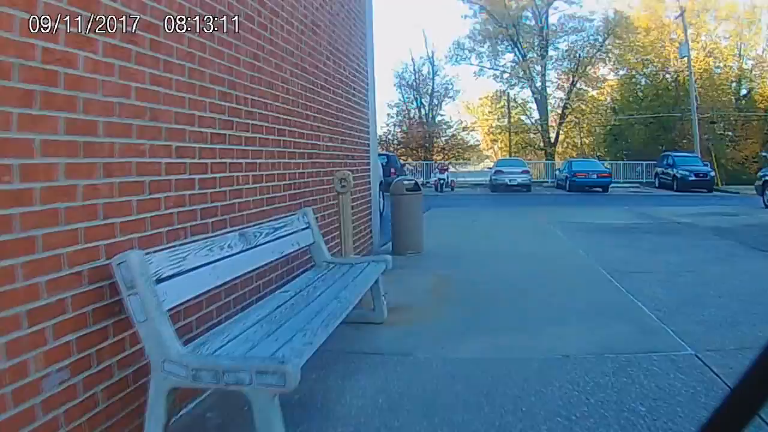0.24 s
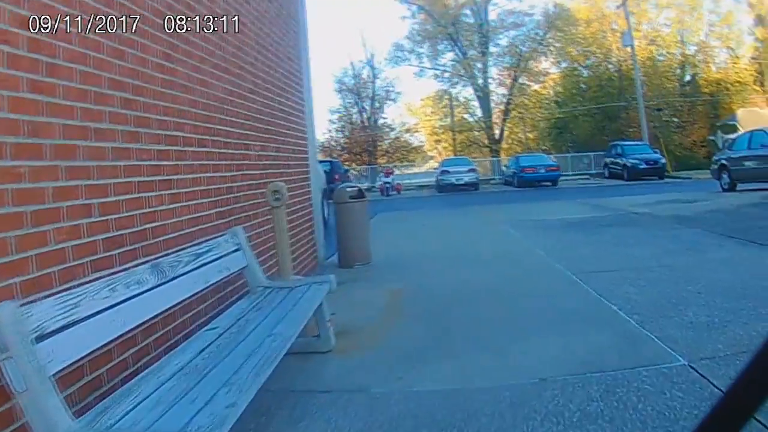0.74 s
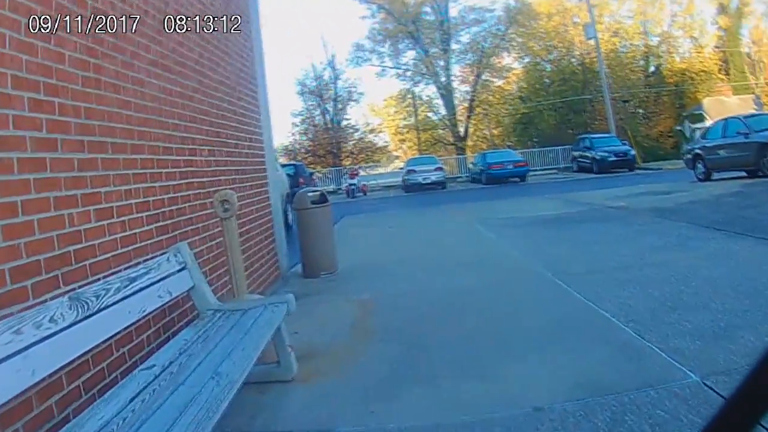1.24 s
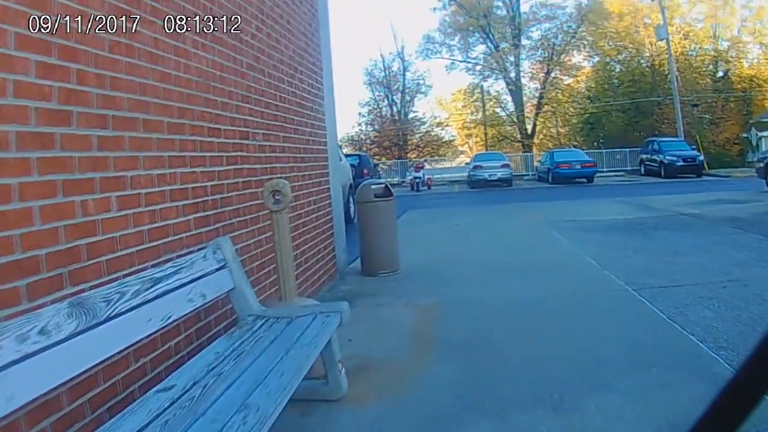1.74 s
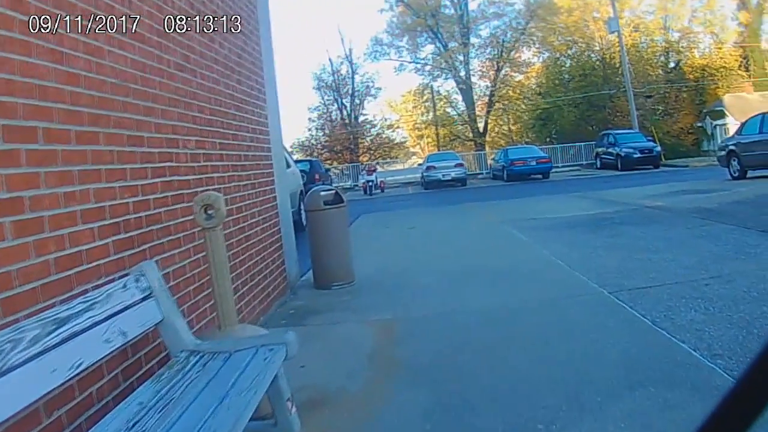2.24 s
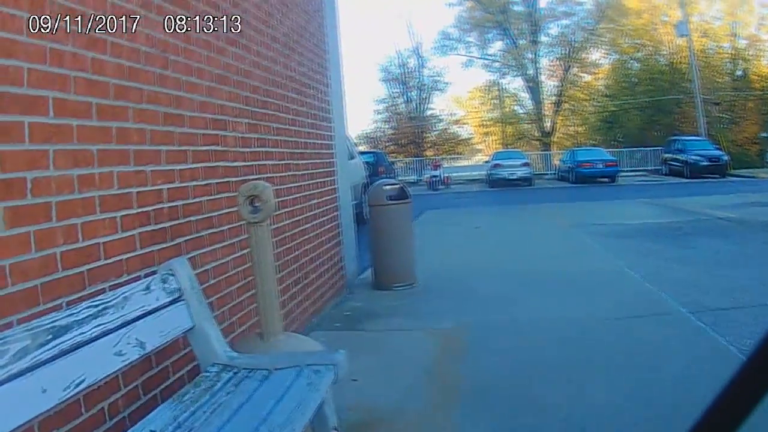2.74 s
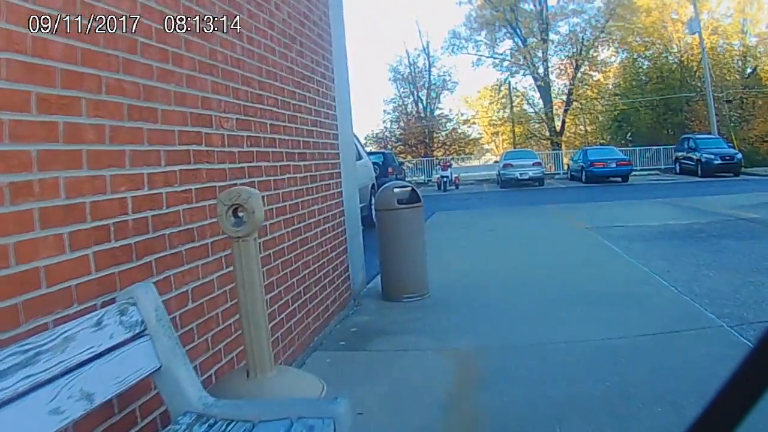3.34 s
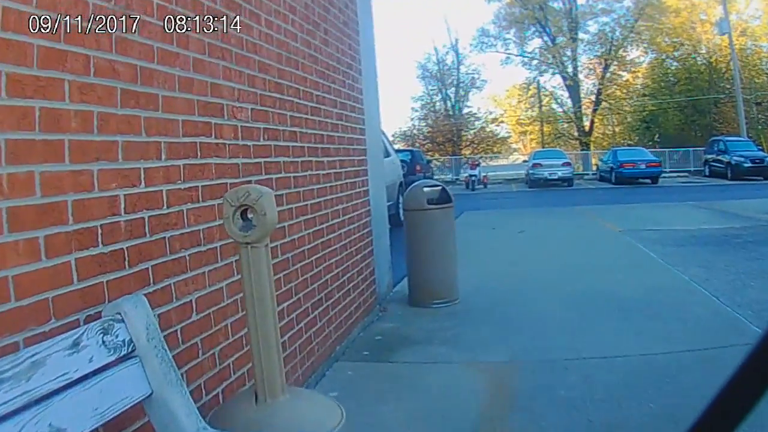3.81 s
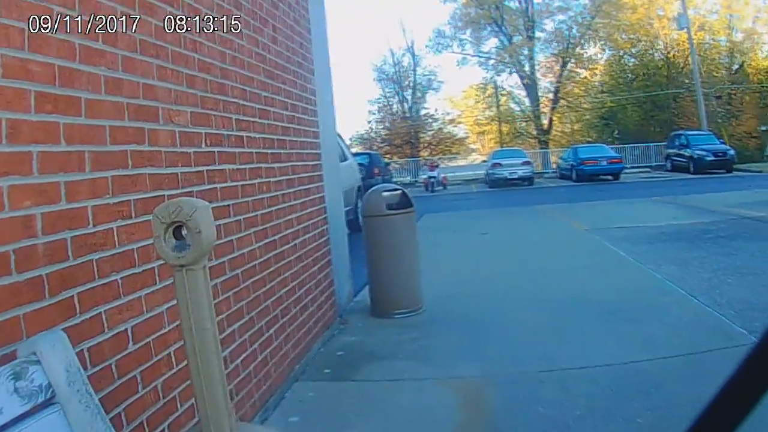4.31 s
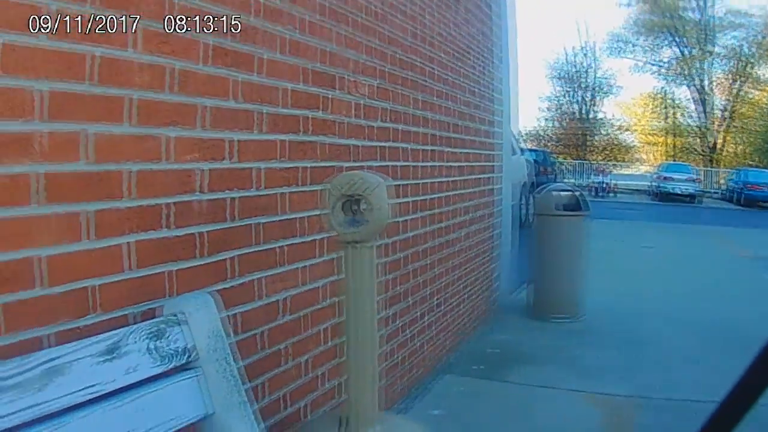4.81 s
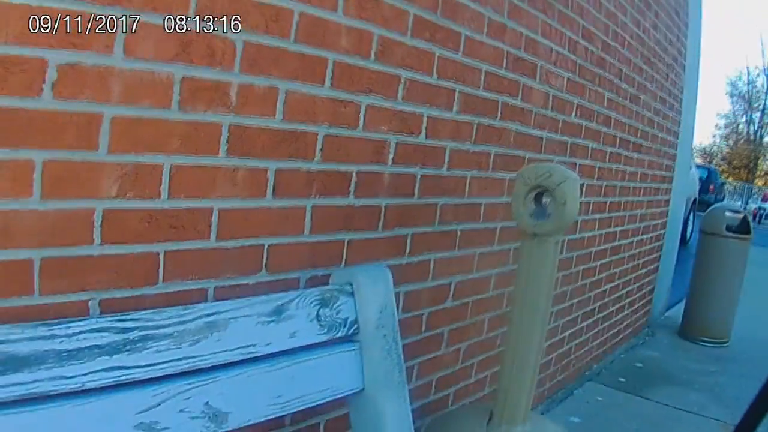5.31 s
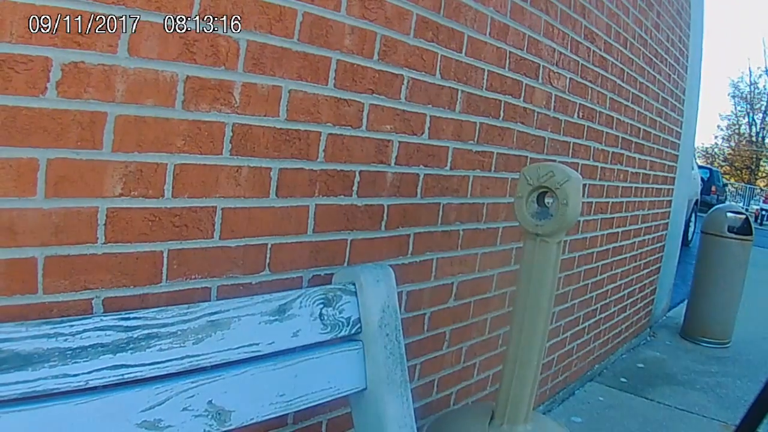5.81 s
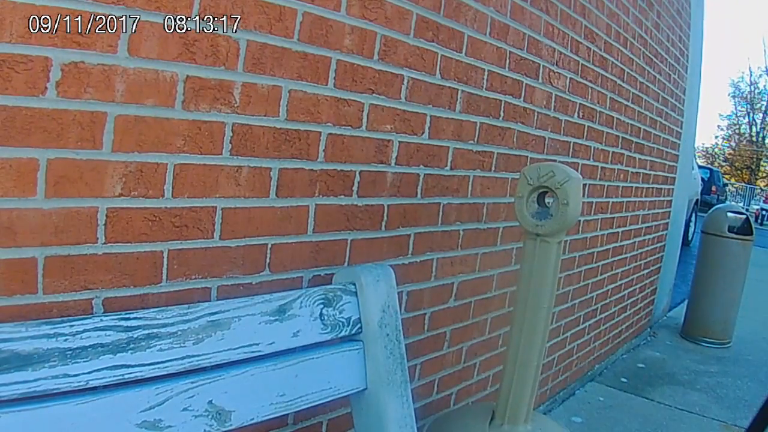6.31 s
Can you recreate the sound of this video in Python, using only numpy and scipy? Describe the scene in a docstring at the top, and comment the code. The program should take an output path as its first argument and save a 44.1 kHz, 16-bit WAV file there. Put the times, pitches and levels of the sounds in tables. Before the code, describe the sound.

A bicycle rolls slowly outdoors and is leant at a brick wall: low shuddering rumble, plastic ticks, hollow frame knocks, harsh clipped buffeting near the end.

```python
"""Camera clamped to a bicycle

The bicycle is wheeled slowly over paving and leant against a wall, heard from the camera's microphone.
The mount is noise resonating near 30 Hz; its slips are shaped pressure steps that overdrive the input.
Knocks, thuds and clacks are short shaken ticks ringing the frame, the saddle and tyres, and the case.
Rolling and rubbing are gritty noise through the same modes, with filtered noise for squeaks and crackle.
The camera adds a steady shaped hiss, a swelling fizz and a whine of close sine tones."""
import sys
import numpy as np
from scipy import signal
from scipy.fft import rfft, irfft
from scipy.io import wavfile
from scipy.ndimage import uniform_filter1d

SR = 44100
rng = np.random.default_rng(int(sys.argv[2]) if len(sys.argv) > 2 else 0)


def digitize_waveform(pressure):
    """Quantize a signal to 16-bit integers and store it at the path in sys.argv[1].

    Rows of a 2-D input are taken as channels; values are limited to [-1, 1].
    """
    field = np.atleast_2d(pressure).T
    bounded = np.clip(field, -1, 1)
    quanta = np.round(bounded * 32767).astype(np.int16)
    wavfile.write(sys.argv[1], SR, quanta)


def volts(x):
    """Linear amplitude factor 10**(x/20) for a level x in dB, scalar or array-like."""
    e = np.asarray(x, float) / 20
    return 10 ** e


N = 288839  # length [samples]
RAIL = .255  # pressure at which the microphone input clips [full scale]


def evened(x):
    """Scales to rms 1."""
    return x / np.sqrt(np.mean(x ** 2) + 1e-20)


def curve(rows, order):
    """Draws one column of a table as a line through time, sample by sample."""
    rows = np.array(rows)
    return np.interp(np.arange(N) / SR, rows[:, 0], rows[:, order])


def add(mix, s, sound):
    """Mixes a sound in at s seconds."""
    part = mix[max(round(s * SR), 0):][:len(sound)]
    part += sound[:len(part)]


def ease(u):
    """Soft step from 0 to 1."""
    return .5 - .5 * np.cos(np.pi * np.clip(u, 0, 1))


def swells(rows, rise, fall):
    """Sums soft-edged envelopes, one per (start, length, level) row; rise and fall give each ramp."""
    t = np.arange(N) / SR
    (rise_s, rise_lead), (fall_s, fall_lead) = rise, fall  # (ramp [s], lead [share of the ramp])
    total = np.zeros(N)
    for s, length, db in rows:
        fade_in = ease((t - s) / rise_s + rise_lead)
        fade_out = ease((s + length - t) / fall_s + fall_lead)
        total += volts(db) * fade_in * fade_out
    return total


def ring(x, modes, detune=0, bright_db=0, flip=-1):
    """Rings a bank of resonances; bright_db lifts the upper half, flip scales each mode from the last."""
    out = np.zeros(len(x))
    for k, (hz, width, db) in enumerate(modes):
        hz = hz * (1 + detune * np.sin(k * k + detune * 1000))
        lift_db = bright_db * (k > len(modes) / 2)
        out += flip ** k * volts(db + lift_db) * signal.lfilter(*signal.iirpeak(hz, hz / width, SR), x)
    return out


def grit(per_s, spread_db, smooth, grain_ms):
    """Sparse short scuffs of uneven size, over a share of smooth noise."""
    size = volts(spread_db * np.minimum(rng.exponential(1, N), 4))
    size = size * (rng.random(N) < per_s / SR)
    scuffs = signal.oaconvolve(size, np.exp(-np.arange(2000) / SR * 1000 / grain_ms))[:N]
    return (evened(scuffs) + smooth) * rng.standard_normal(N)


def coarse_grit():
    """Uneven coarse scuffing, for the rolling and the rasp of the rubs."""
    return grit(per_s=120, spread_db=2, smooth=2, grain_ms=5)


def after(hits, decay_ms):
    """An envelope that jumps by the size of each hit (time, size) and dies away."""
    spikes = np.zeros(N)
    for s, size in hits:
        spikes[round(s * SR)] += size
    dying = signal.lfilter([1], [1, -np.exp(-1000 / decay_ms / SR)], spikes)
    return uniform_filter1d(dying, 400)  # rounds the onsets


def blows(rows, modes, shake_ms, tick, detune, contact_ms, flip):
    """Each blow is a tick and a short random shake, softened by the contact time, ringing the modes."""
    out, t = np.zeros(N), np.arange(9000) / SR
    pad = signal.windows.hann(round(contact_ms * SR / 1000) + 3)
    for s, peak_db, bright_db in rows:
        decays = t * 1000 / shake_ms
        drive = rng.standard_normal(len(t)) * np.exp(-decays) * ease(decays / 0.31)
        drive[0] += tick * np.sqrt(shake_ms)
        drive = np.convolve(drive, pad)[:len(t)]
        sound = ring(drive, modes, detune * rng.uniform(-1.058, 1), bright_db, flip)
        add(out, s, volts(peak_db) * sound / abs(sound).max())
    return out


# How hard things move: (time [s], sway of the mount [dB], rolling felt in the frame [dB])
MOTION = [(0.0, -47, -40.5), (0.25, -41.5, -47.5), (0.56, -37.5, -52.5), (0.78, -35.5, -52),
          (0.89, -40.5, -52), (1.35, -44, -52), (1.5, -38.5, -49), (1.7, -37.5, -58), (2.21, -42.5, -52),
          (2.46, -39, -38), (2.63, -41.5, -51), (2.94, -40.5, -54.5), (3.56, -42, -61), (3.9, -43, -56.5),
          (4.36, -50, -66), (4.82, -57, -44), (5.2, -52, -52.5), (5.4, -45, -36), (5.53, -38, -50.5),
          (5.8, -36.5, -61), (6.02, -42, -84), (6.24, -46.5, -57), (6.4, -52, -53.5), (6.55, -46, -62)]
# Resonances of the mount: (frequency [Hz], width [Hz], level [dB])
MOUNT_MODES = [(30.8, 10.5, 2), (49.7, 22, -4.5), (103.3, 58, -21.5)]


def sway():
    """Low shaking of the mount on its springy clamp, rocked harder by knocks and the smaller slips."""
    rock_db, rock_ms = -14, 24.8  # level under the blow, decay
    shake = ring(ring(rng.standard_normal(N), MOUNT_MODES), [(38.5, 162, 0)])
    envelope = uniform_filter1d(abs(signal.hilbert(shake)), 2500)
    steadied = evened(shake / envelope ** 0.68)  # partly levels the random swelling
    hits = [(s, volts(db)) for s, db, _ in KNOCKS]
    hits += [(s, abs(end - start) / 2) for s, start, end, _ in JOLTS if abs(end) < .2]
    return (volts(curve(MOTION, order=1)) + volts(rock_db) * after(hits, rock_ms)) * steadied


# Resonances of the bicycle frame: (frequency [Hz], width [Hz], level [dB])
FRAME_MODES = [(108.5, 23.4, -4.5), (191, 12, -21.5), (253, 7.2, 0), (299.8, 13.1, 5.5), (316, 33, -5),
               (363.6, 15.4, -2.5), (438, 12.4, -6), (478, 39, -5), (526, 3.3, -15), (602, 2.6, -15.5),
               (728, 23, -20), (904, 95, -23), (964, 13.5, -18), (1190, 67, -23)]


def rolling():
    """Coarse grit of the rolling tyres hums in the frame, and each knock leaves the frame humming."""
    judder_db, judder_ms = -17.5, 45  # level under the knock, decay
    dulled = signal.sosfilt(signal.butter(2, 1500, fs=SR, output="sos"), coarse_grit())
    frame = evened(ring(dulled, FRAME_MODES))
    judder = after([(s, volts(db)) for s, db, _ in KNOCKS], judder_ms)
    return (volts(curve(MOTION, order=2)) + volts(judder_db) * judder) * frame


# Resonances of the plastic case: (frequency [Hz], width [Hz], level [dB])
CASE_MODES = [(734, 80, -6.5), (1088, 50, -4), (1301, 67, -1), (1406, 16, -0.5), (1498, 66, 0.5),
              (1812, 80, 0.5), (1905, 118, -3.5), (2100, 249, -8), (2240, 43, -11), (2553, 37, -18),
              (3030, 70, -22), (3266, 40, -17), (3455, 160, -20.5), (4400, 200, -29), (5080, 70, -22.5),
              (5840, 67, -36), (5870, 110, -31.5), (7900, 200, -45)]
# Rubs on the case: (start [s], length [s], level [dB])
RUBS = [(0, .2, -56), (0.46, 0.11, -66), (0.61, 0.22, -65), (0.94, 0.22, -71), (1.375, .16, -77),
        (1.848, 0.24, -66.5), (2.241, 0.39, -59), (2.773, .13, -65), (3.06, 0.18, -74), (3.246, 0.17, -63),
        (3.511, 0.35, -64.5), (3.98, .17, -66), (4.301, 0.28, -70.5), (4.578, 0.26, -69), (4.79, 0.25, -61),
        (5.046, 0.14, -72.5), (5.185, 0.097, -58), (5.325, 0.25, -59), (5.655, 0.023, -67),
        (5.838, 0.016, -64), (6.239, 0.026, -53.5), (6.323, 0.22, -63)]


def rubbing():
    """Hands and cables rub the case: fine scuffs ring the plastic, with a brighter rasp of the frame."""
    rest_db = -86.5  # level always present under the rubs
    rub = grit(per_s=220, spread_db=2.8, smooth=1.5, grain_ms=3)
    case = evened(ring(rub, CASE_MODES, bright_db=3.0))
    backwards = coarse_grit()[::-1]  # scuffs swell instead of dying
    rasp = evened(ring(backwards, FRAME_MODES, bright_db=9))
    press = swells(RUBS, rise=(0.023, .5), fall=(0.12, .5))
    return (press + volts(rest_db)) * case + press * volts(-0.5) * rasp


# Colour of the camera's hiss: (frequency [Hz], relative level [dB])
HISS_COLOUR = [(59, -40), (100, -28.5), (197, -17), (295, -16.5), (406, -6.5), (492, -10.5), (818, -31),
               (1800, -25.5), (2420, -31.5), (7140, -37.5), (12900, -39.5), (14100, -33), (16000, -40)]


def hiss():
    """Steady electronic noise shaped along a spectrum, with its part above 2500 Hz setting the level."""
    level_db = -76
    hz = np.fft.rfftfreq(N, 1 / SR)
    f, db = np.transpose(HISS_COLOUR)
    shape = volts(np.interp(np.log(hz + 1), np.log(f), db))
    shaped = irfft(rfft(rng.standard_normal(N)) * shape, N)
    return volts(level_db) * shaped / np.sqrt(np.mean(shape ** 2 * (hz > 2500)))


# Starts of the short swells of fizz: time [s]
FIZZ_TIMES = [.459, .832, .874, 1.234, 1.714, 2.211, 2.612, 3.04, 3.459, 3.959, 4.376, 4.744, 5.207, 5.656,
              6.108, 6.155]
# Bands of the fizz: (frequency [Hz], width [Hz], level [dB])
FIZZ_BANDS = [(11150, 590, 2), (15400, 2300, -15)]


def fizz():
    """Bright band-filtered electronic noise that swells now and then over a faint bed."""
    rest_db, swell_db, swell_ms = -82, -77.5, 42
    gate = volts(rest_db) * np.ones(N)
    for s in FIZZ_TIMES:
        add(gate, s, volts(swell_db) * signal.windows.tukey(round(swell_ms * SR / 1000), .3))
    banded = ring(rng.standard_normal(N), FIZZ_BANDS)
    return gate * evened(ring(banded, [(13000, 18000, 0)]))


# Tones of the whine: (frequency [Hz], rms level [dB])
WHINE_TONES = [(13695, -96), (13749, -86), (13803, -93), (13857, -97)]


def whine():
    """Close sine tones that beat into a thin pulsing whine."""
    t = np.arange(N) / SR
    return sum(np.sqrt(2) * volts(db) * np.cos(2 * np.pi * hz * t) for hz, db in WHINE_TONES)


# Clacks of the case: (time [s], peak level [dB], brightness [dB])
CLACKS = [(.0544, -42, -3), (.17, -63, 6), (.4494, -52, 4), (.4844, -57, 7), (1.2164, -51, 0),
          (1.3886, -52, 9.5), (1.487, -41.5, -9), (1.5827, -50.5, 2), (1.6127, -53.5, 10),
          (1.7148, -48.5, -3), (2.2398, -41.5, -7), (2.281, -42, -8), (2.3226, -43.5, -7),
          (2.363, -40.5, -11), (2.418, -40, -1), (2.682, -50.5, 8), (2.7826, -35.5, -2.5),
          (2.815, -46.5, -8), (3.0692, -56, 8), (3.124, -50.5, -6), (3.3129, -45, 3), (3.6048, -36.5, -6),
          (3.6968, -47.5, 6), (3.7839, -50, 0), (3.8333, -39.5, -6), (3.979, -48.5, -2), (4.009, -43, 6),
          (4.073, -49, 5), (4.3276, -49, 0), (4.4776, -45, 0), (4.577, -37.5, -13), (4.623, -42, -14),
          (4.738, -47, -4), (4.799, -40.5, 2), (4.847, -45, -12), (4.8623, -39, -5), (4.8747, -32, -8),
          (4.8893, -29.5, -5.5), (4.9045, -42, 0), (4.921, -39, -9), (4.9407, -38, -17), (4.9623, -38, -6),
          (5.003, -25, -2.5), (5.1786, -30, 3), (5.3196, -29.5, 5), (5.4095, -35, -3), (5.6544, -53, 11),
          (5.8403, -34, -1), (6.2325, -41, 1), (6.2418, -41, 15), (6.3041, -22.5, 0.5), (6.3769, -45, -1)]


def clacks():
    """Hard, brief contacts ringing the plastic case."""
    return blows(CLACKS, CASE_MODES, shake_ms=3.18, tick=1.35, detune=0.023, contact_ms=.1, flip=-1.007)


# Dull knocks in the frame: (time [s], peak level [dB], brightness [dB])
KNOCKS = [(0.072, -36, 16), (.153, -23.5, 2), (.483, -36.5, 8), (1.072, -23.5, 10.5), (1.593, -36, -3),
          (1.7, -37, 10), (1.904, -24, -15), (1.965, -39, -8), (2.042, -35.5, -5), (2.238, -34, 17),
          (2.395, -21.5, 14), (2.43, -55, 3), (2.688, -23, 1), (2.779, -31, 15.5), (3.128, -40.5, 12),
          (3.315, -40, -4), (3.608, -34, -9), (3.834, -35, 6), (4.073, -37.5, 6), (4.434, -39, -3),
          (4.477, -45, 2), (4.576, -39, 5), (4.625, -34.5, 14), (4.809, -27.5, 13.5), (4.877, -31, 0),
          (4.918, -30.5, 21), (5.01, -32.5, 14.5), (5.181, -26, 18), (6.307, -35.5, 9)]


def knocks():
    """Softer contacts ringing the frame, its modes starting in step."""
    return blows(KNOCKS, FRAME_MODES, shake_ms=17, tick=1.44, detune=0.0153, contact_ms=1.436, flip=1)


# Slips of the mount: (time [s], pressure before [full scale], pressure after [full scale], rise [ms])
JOLTS = [(.2258, .01, -.058, 4.69), (.2338, -.057, .04, 4.06), (.2698, -.037, .042, .95),
         (.67, -.061, .099, .88), (.7604, -.054, .164, .78), (.7917, -.051, .105, .86),
         (.8423, -.014, .048, .88), (.8707, -.051, .031, 1.77), (1.1804, -.06, .101, .86),
         (1.235, .002, -.066, 5), (1.2428, -.064, .027, 3.44), (1.2473, .052, .138, .84),
         (1.2998, -.037, .095, .91), (1.3291, -.032, .051, .98), (2.5881, -.023, .003, .8),
         (2.6188, -.043, .011, 1.23), (2.7376, -.044, .02, .79), (3.194, -.04, .03, .94),
         (5.3219, 0, -.21, 1.3), (5.3279, -.137, .23, 1.1), (5.3417, .063, -.249, .6),
         (5.3552, -.071, .135, .74), (5.3582, .039, -.073, 1.56), (5.3612, -.06, .251, .28),
         (5.3827, .021, -.251, .31), (5.3945, .057, .249, .68), (5.4128, -.06, -.222, 2.2),
         (5.4208, -.123, .252, .28), (5.4379, .044, -.25, .51), (5.4541, -.053, .252, .17),
         (5.4721, .032, -.252, .31), (5.4898, -.089, .251, 4.43), (5.5232, .002, -.173, 5.31),
         (5.5315, -.06, .213, 1.11), (5.6534, -.025, .067, 1.95), (5.7636, -.002, .178, 1),
         (5.8057, -.058, .111, 1.36), (5.8364, -.027, .118, 1.03), (5.8827, .007, -.114, 7.19),
         (5.8951, -.055, .238, .96), (5.9245, -.017, .121, .87), (6.0039, -.025, .048, 1.11)]


def jolts():
    """The mount loads up, may kick back and snaps over; the level then sags back with a small undershoot."""
    load_ms, kick_ms = 11, .45  # longest loading, kick before the snap
    swing, damp = 1.6, 2.1  # quarter swing and decay of the sag, in sag times
    kick_share, kick_most = .25, 0.032  # share of an upward step, greatest kick [full scale]
    slowest_kick_ms = 1.5  # rise beyond which a slip neither kicks nor snaps sharply
    out, settled = np.zeros(N), 0
    for s, before, end, rise_ms in JOLTS:
        hard = abs(end) > .96 * RAIL and rise_ms < 1  # a straight run into the rail: sharp corners
        kicks = .75 < rise_ms < slowest_kick_ms and before > -.1
        kick = np.clip(kick_share * (end - before), 0, kick_most) * kicks
        if abs(end) > .2 and not kick:
            sag_ms = 9.1
        else:
            sag_ms = min(4.4 * (RAIL / abs(end)) ** 0.38, 11)  # small slips sag slowly
        span_ms = rise_ms * (1 if hard else 1.6)
        at = slice(round(s * SR) - 800, round(s * SR) + 4000)
        ms = (np.arange(at.start, at.stop) / SR - s) * 1000 + span_ms / 2  # zero where the snap begins

        room_ms = np.clip((s - settled) * 1000 - span_ms / 2 - kick_ms, .5, load_ms)  # since the last slip
        load = ease(1 + (ms + kick_ms) / room_ms)
        edge_ms = 0.19 * (RAIL / abs(end - before)) ** 0.66  # sharp kick before big slips, dull before small
        held = out[at] * (1 - load) + before * load - kick * ease((ms + kick_ms) / edge_ms)

        late = np.maximum(ms - span_ms, 0) / sag_ms
        overshoot = min(0.66 * kick, 0.71 * abs(end))
        rebound = np.sign(end) * overshoot * ease(late * sag_ms / 0.59)
        sag = (end - rebound) * np.exp(-late / damp) * np.cos(np.pi / 2 * late / swing)

        snap = np.clip(ms / span_ms, 0, 1)
        if not hard:
            # a power under 1 lets go with a sharp corner and lands softly
            snap = ease(snap ** (0.74 if rise_ms < slowest_kick_ms else 1))
        out[at] = held * (1 - snap) + sag * snap
        settled = s + span_ms / 2000
    return out


# Brief kicks of the mount: (time just into the release [s], depth, negative is upward [full scale])
BRIEF_KICKS = [(.685, .002), (.7737, .007), (.8071, .005), (1.1986, .006), (1.273, .007), (1.2824, .009),
               (5.3273, .008), (5.3347, .022), (5.3547, .01), (5.3609, -.05), (5.4237, .125),
               (5.4305, .006), (5.4649, .018), (5.4941, .025), (5.9021, .004), (1.3225, .003)]


def brief_kicks():
    """Brief kicks of the mount, alone or just before a slip: short dips, one upward, slower when deep."""
    out, ms = np.zeros(N), np.arange(120) / SR * 1000
    for s, depth in BRIEF_KICKS:
        fall_ms = .12 + 40 * max(depth, 0) ** 2
        release = ease((ms - fall_ms - .3) / (fall_ms + .34))
        add(out, s - (fall_ms + .55) / 1000, -depth * ease(ms / fall_ms) * (1 - release))
    return out


# Low thuds under some of the knocks: (time [s], peak level [dB], brightness [dB])
THUDS = [(1.075, -47, 0), (1.91, -32, 0), (2.05, -35.5, 0), (2.4, -26, 0), (2.69, -47, 0), (3.61, -39, 0)]
# Resonances of the saddle and tyres: (frequency [Hz], width [Hz], level [dB])
TYRE_MODES = [(107, 16, -3.5), (157, 61, -8.5)]


def thuds():
    """Low thuds under some of the knocks, ringing broad modes of the saddle and tyres."""
    return blows(THUDS, TYRE_MODES, shake_ms=30, tick=5.5, detune=.03, contact_ms=2.4, flip=0.81)


# Faint squeaks of the case: (start [s], length [s], level [dB])
SQUEAKS = [(1.378, 0.024, -74), (1.455, 0.0091, -74), (1.474, 0.018, -63), (2.244, 0.0093, -67),
           (2.36, 0.0069, -73), (2.41, 0.012, -63)]


def squeaks():
    """A narrow fuzzy whistle where plastic slides on plastic."""
    band = [(3320, 220, 0)]  # (Hz, width Hz, dB)
    whistle = evened(ring(ring(rng.standard_normal(N), band), band))
    return swells(SQUEAKS, rise=(0.0053, 0), fall=(.006, .5)) * whistle


# Spits of crackle at three of the snaps to the rail: (time [s], peak level [dB])
CRACKLE = [(5.3414, -36), (5.3604, -38), (5.4375, -31)]


def crackle():
    """Spits of bright noise about a millisecond long, at three of the snaps to the rail."""
    centre_hz, length_ms = 10000, 0.7
    out, t = np.zeros(N), np.arange(200) / SR
    for s, peak_db in CRACKLE:
        burst = rng.standard_normal(len(t)) * ease(1.5 - t * 1000 / length_ms)
        spit = ring(ring(burst, [(centre_hz, 3500, 0)]), [(centre_hz, 9000, 0)])
        add(out, s, volts(peak_db) * spit / abs(spit).max())
    return out


def scene():
    """While a jolt presses the microphone toward its limit, the other vibrations are squeezed out."""
    jolt = jolts() + brief_kicks()
    free = 1 - ease(uniform_filter1d(abs(jolt), 300) / 0.22)
    vibration = sway() + rolling() + rubbing() + clacks() + knocks() + thuds() + squeaks()
    electronics = hiss() + fizz() + whine()
    return (jolt + crackle() + free * vibration + electronics)[None]


def roll_off(x):
    """The treble ends steeply here."""
    return signal.sosfilt(signal.butter(12, 16790, fs=SR, output="sos"), x)


def record(dry):
    """The microphone input clips at its rail."""
    clipped = np.clip(dry, -RAIL, RAIL)
    return roll_off(clipped)


dry = scene()
out = record(dry)
digitize_waveform(out)
```